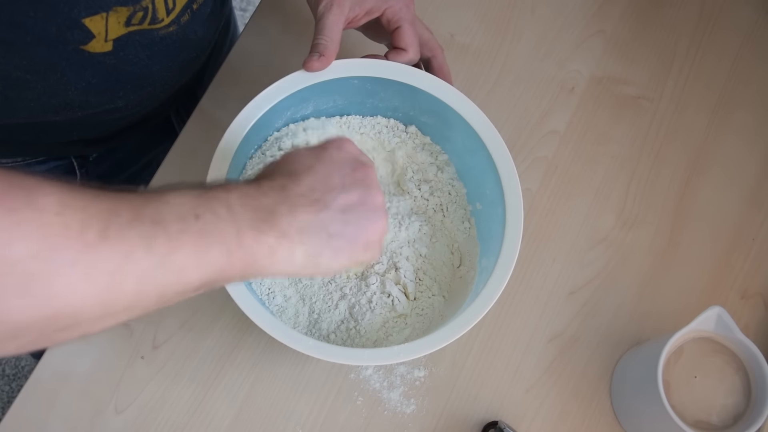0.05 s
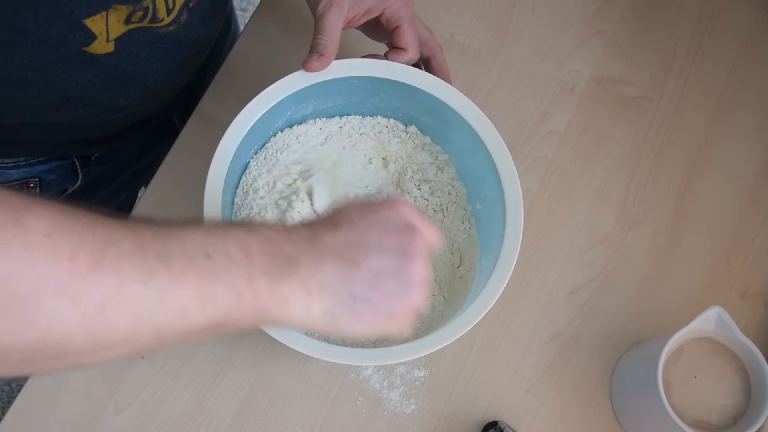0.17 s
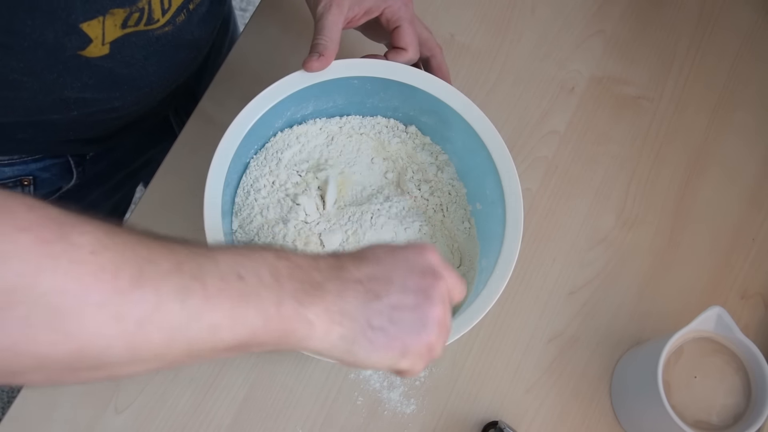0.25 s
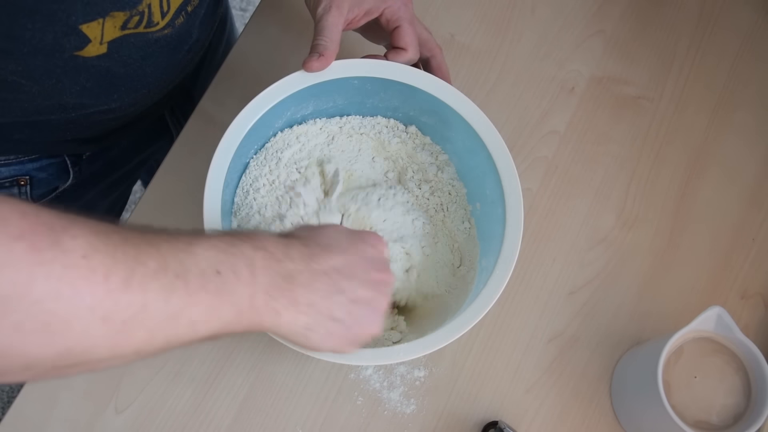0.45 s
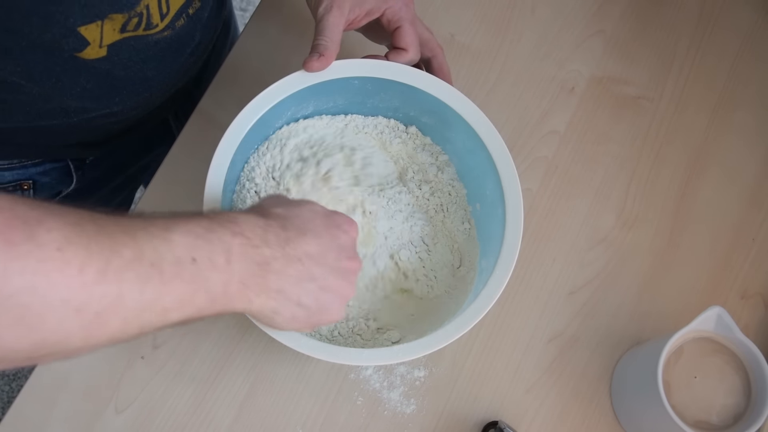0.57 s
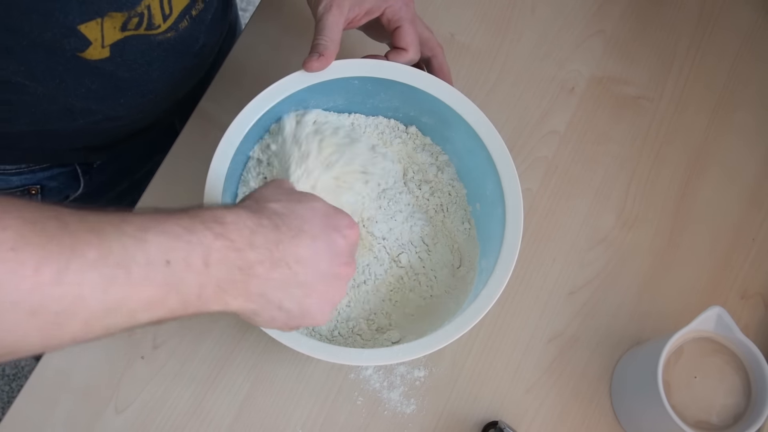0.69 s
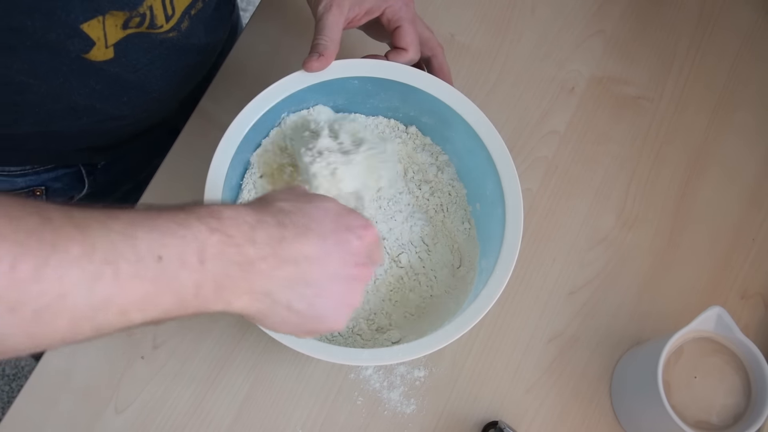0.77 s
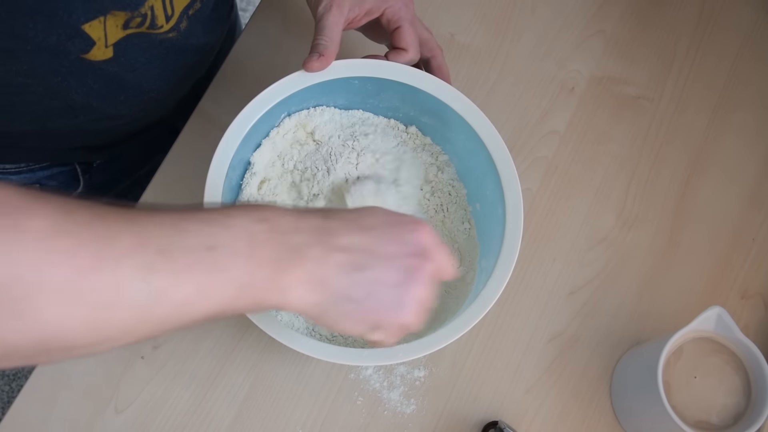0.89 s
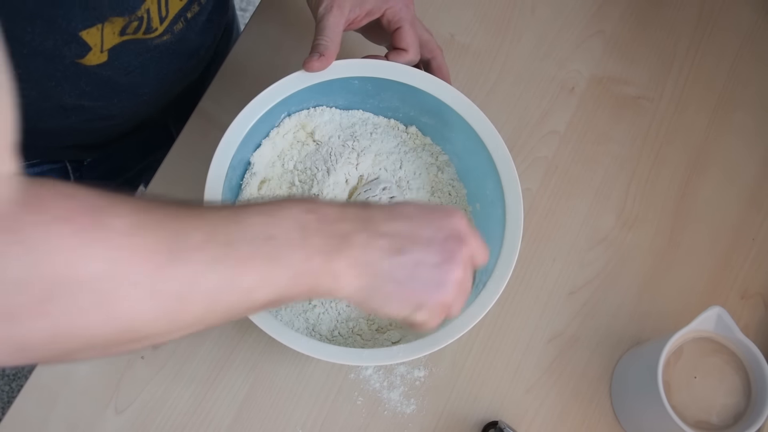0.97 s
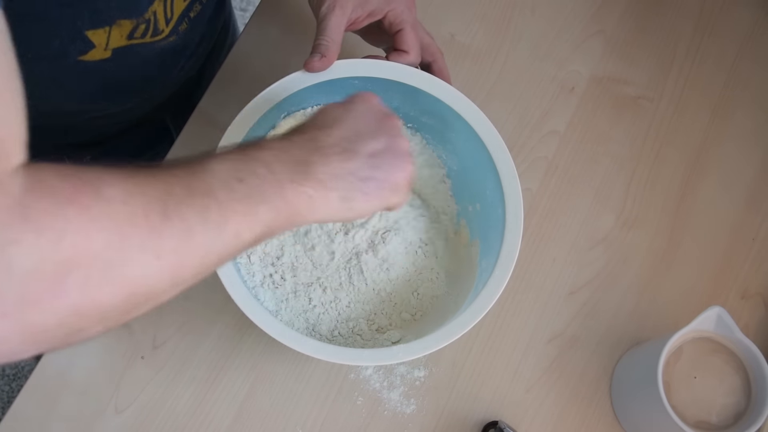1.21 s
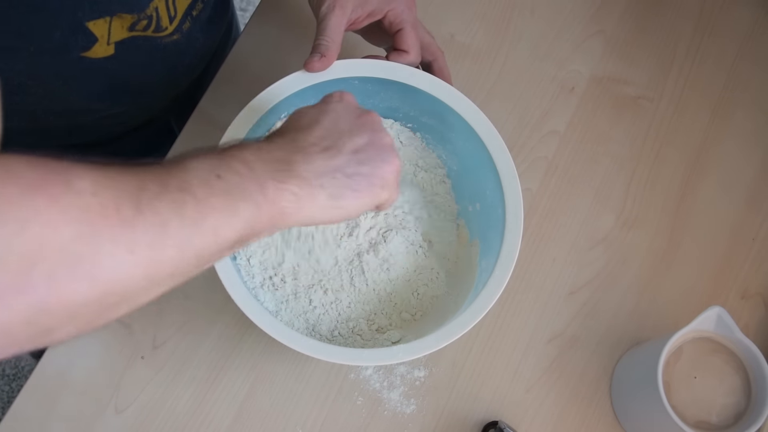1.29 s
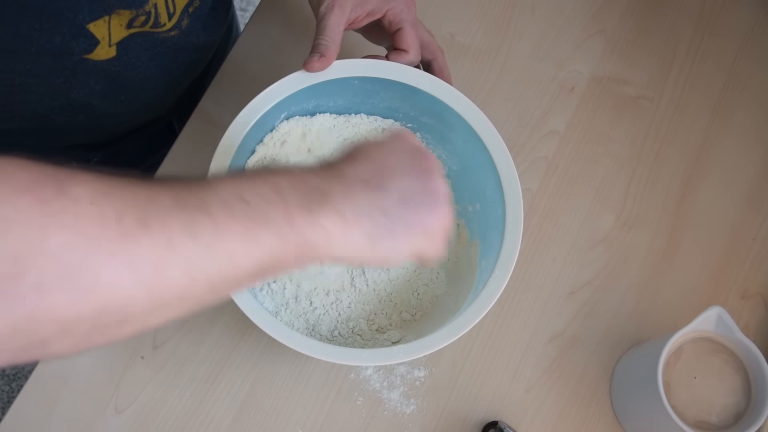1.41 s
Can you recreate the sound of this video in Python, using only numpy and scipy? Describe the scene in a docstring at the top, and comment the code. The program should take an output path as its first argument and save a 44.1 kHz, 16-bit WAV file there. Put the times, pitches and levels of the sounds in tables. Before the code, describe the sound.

Spoon stirring dry flour in a plastic bowl, close up in a small echoing kitchen. A soft grainy rustle runs throughout. A dull knock at 0.23 s, the loudest, brighter hollow clack at 0.33, a muffled thump at 0.49. Quieter rustling follows, then a soft thump at 0.93, a very short raspy scrape at 0.99 and swishes until 1.2. Faint hiss, low hum and thin high whine behind.

```python
"""Stirring flour in a plastic bowl

A spoon stirs dry flour in a plastic mixing bowl on a wooden table, in a small kitchen that answers with echo.
It knocks the wall four times, mostly cushioned by flour: decaying tones and noise bursts make thump and ring.
It scrapes once along the bare plastic: tiny random slips ring the spoon. Finer slips make the flour whisper.
Behind lie shaped noise for a faint hiss, rumble and hum, and a wavering sine for a thin high whine."""
import sys
import numpy as np
from scipy import signal
from scipy.fft import rfft, irfft, next_fast_len
from scipy.io import wavfile

SR = 44100
rng = np.random.default_rng(int(sys.argv[2]) if len(sys.argv) > 2 else 0)


def master(y):
    """Save y as 16-bit WAV."""
    cut = np.clip(np.atleast_2d(y).T, -1, 1)
    pcm = np.round(cut * 32767)  # scale
    wavfile.write(sys.argv[1], SR, pcm.astype(np.int16))


N = 63945  # length in samples

# colour of flour crushed under the spoon and of the scrape's rasp: (frequency [Hz], level [dB per Hz])
GRIT_COLOUR = [(500, -3.5), (2000, 8), (3000, 4.5), (4200, 3.5), (6300, 0), (8200, -3.5), (9800, -3),
               (13000, -23), (16000, -16)]


def amp(db):
    """Turn decibels into an amplitude factor."""
    return 10 ** (np.asarray(db) / 20)


def unit(x):
    """Scale x to an rms level of 1."""
    return x / np.sqrt(np.mean(x ** 2) + 1e-20)


def along(points, hz):
    """Read a curve of (frequency, value) points, joined by lines on a log frequency axis."""
    freqs, values = np.transpose(points)
    return np.interp(np.log(hz + 1), np.log(freqs + 1), values)


def filtered(x, response):
    """Multiply the spectrum of x by a response, which may be complex."""
    size = next_fast_len(N + SR // 2)
    hz = np.fft.rfftfreq(size, 1 / SR)
    return irfft(rfft(x, size) * response(hz), size)[..., :N]


def causal(x, gain):
    """Filter x by a gain curve with minimum phase, so that no sound comes before its cause."""
    size = 2 * next_fast_len(N)
    hz = np.fft.rfftfreq(size, 1 / SR)
    cepstrum = irfft(np.log(np.maximum(gain(hz), 1e-6)), size)
    # folding the second half onto the first gives the minimum phase
    cepstrum[1:size // 2] *= 2
    cepstrum[size // 2 + 1:] = 0
    return irfft(rfft(x, size) * np.exp(rfft(cepstrum)), size)[:N]


def coloured(x, spectrum):
    """Shape x by a spectrum curve, at rms 1."""
    return unit(filtered(x, lambda hz: amp(along(spectrum, hz))))


def noise(spectrum):
    """Make random noise with the given colour, at rms 1."""
    return coloured(rng.standard_normal(N), spectrum)


def band(centre_hz, width_hz):
    """Make noise gathered around one frequency, at rms 1."""
    return unit(filtered(rng.standard_normal(N), lambda hz: 1 / (1 + ((hz - centre_hz) / width_hz) ** 2)))


def struck(t, attack, t60):
    """Rise quickly, then die away by 60 dB every t60 seconds, as struck things do."""
    return (1 - np.exp(-t / attack)) * amp(-60 * t / t60)


def slips():
    """Scatter tiny stick-slip impulses of uneven size and random sign, at rms 1."""
    slips_per_s, spread_db = 3500, 5
    hit = rng.random(N) < slips_per_s / SR
    sign = rng.choice([-1, 1], N)
    return unit(hit * sign * amp(spread_db * rng.standard_normal(N)))


def kitchen(x):
    """Add a diffuse echo of decaying noise to the direct sound; mainly its treble spreads sideways."""
    # how long the echo takes to fade by 60 dB: (frequency [Hz], time [s])
    echo_t60 = [(100, 0.29), (400, 0.32), (1000, .5), (2500, 0.41), (6000, 0.29), (14000, 0.42)]
    # how strongly the room answers: (frequency [Hz], level [dB])
    echo_gain = [(100, 3.5), (400, -3), (1000, -8.5), (2500, -4.5), (8000, -2), (15000, -7.5)]
    # sideways spread of the echo: (frequency [Hz], side level over middle [dB])
    echo_width = [(100, -29), (600, -74), (1300, -19.5), (2500, -11.5), (5000, -6.5), (9000, -3),
                  (15000, -2)]
    delay_s, build_s = 0.0049, 0.0077
    hz, t, cells = signal.stft(rng.standard_normal((2, SR)), SR, nperseg=256)
    fade = struck(np.maximum(t - delay_s, 0), build_s, along(echo_t60, hz)[:, None])
    tail = signal.istft(cells * fade, SR, nperseg=256)[1]
    tail = tail / np.linalg.norm(tail[0])
    echo = signal.fftconvolve(x[None], tail, axes=1)[:, :N]
    echo = filtered(echo, lambda f: amp(along(echo_gain, f)))
    mid = x + echo[0]
    side = filtered(echo[1], lambda f: amp(along(echo_width, f)))
    return np.array([mid + side, mid - side])


def background():
    """Steady shaped noise makes hiss, rumble and hum; a sine with wandering phase makes the whine."""
    # hiss shared by both ears: (frequency [Hz], level [dB per Hz])
    hiss_mid = [(25, 0), (290, -7.5), (400, -3.5), (520, -0.5), (800, 3.5), (1900, -5), (2150, -5),
                (2350, 5.5), (2520, -34), (2750, 2.5), (3050, 3), (3450, -11.5), (4200, -4), (4580, 3),
                (4950, -10), (5280, -1), (5800, -10.5), (6300, -3), (7100, -17), (10000, -19),
                (15000, -26.5)]
    # hiss that differs between the ears: (frequency [Hz], level [dB per Hz])
    hiss_side = [(25, 1.5), (280, -16.5), (1100, -5), (2000, -4.5), (2850, -0.5), (3300, -2.5),
                 (3650, -2.5), (4100, -6), (4550, 1.5), (5050, -17), (5900, -5), (6300, -15), (6700, -13),
                 (10000, -19.5), (15000, -19)]
    # low rumble: (frequency [Hz], level [dB per Hz])
    rumble = [(20, 14), (60, 9), (120, -9), (300, -35), (1000, -63)]
    hiss_mid_db, hiss_side_db, rumble_db = -58, -60, -81
    hum_hz, hum_width_hz, hum_db = 390.6, 15, -72.5
    whine_hz, whine_db = 15690, (-91, -70.5)  # levels (left, right)
    whine_drift = .02  # random phase step in radians per sample
    mid = amp(hiss_mid_db) * noise(hiss_mid)
    mid = mid + amp(rumble_db) * noise(rumble) + amp(hum_db) * band(hum_hz, hum_width_hz)
    side = amp(hiss_side_db) * noise(hiss_side)
    wander = np.cumsum(whine_drift * rng.standard_normal(N))
    whine = np.sin(2 * np.pi * whine_hz * np.arange(N) / SR + wander)
    return np.array([mid + side, mid - side]) + amp(whine_db)[:, None] * whine


def flour():
    """Fine grains slip over each other and rustle with the effort of stirring."""
    # stirring effort, as rustle before a small lift: (time [s], level [dB])
    effort = [(0, -61), (.12, -65.5), (0.212, -57), (.3, -59.5), (.6, -59), (.74, -66.5), (.82, -63),
              (.89, -65.5), (.93, -56), (1.08, -54), (1.168, -61), (1.199, -52), (1.235, -62.5),
              (1.32, -64.5), (1.45, -61.5)]
    # colour of the rustle: (frequency [Hz], level [dB per Hz])
    rustle_colour = [(100, -51), (400, -3), (1400, 4), (2400, 5.5), (3500, -2.5), (6000, -5.5),
                     (10000, -22.5), (16000, -24)]
    lift_db = 0.5
    effort_db = np.interp(np.arange(N) / SR, *np.transpose(effort))
    return kitchen(amp(effort_db + lift_db) * coloured(slips(), rustle_colour))


def scrape():
    """The spoon sticks and slips along the wall under a swelling and fading pressure, and rings."""
    # overlapping swells of pressure: (time [s], peak level [dB], rise [s], fall [s])
    swells = [(.981, -42, 0.0022, 0.014), (0.992, -33.5, 0.0067, 0.0092)]
    # what the sliding spoon rings with: (frequency [Hz], width [Hz], level [dB])
    spoon_modes = [(830, 630, -13.5), (1432, 73, 3), (1770, 115, -9.5), (2387, 88, 0), (2880, 600, -23),
                   (3429, 60, -5), (4510, 133, -14.5), (9150, 1100, -58), (11700, 700, -34.5)]
    rasp_db = -8.5
    t = np.arange(N) / SR
    pressure = sum(amp(db) * np.exp(np.minimum((t - s) / rise, (s - t) / fall))
                   for s, db, rise, fall in swells)

    def spoon(f):
        """Sum the spoon's resonances, with alternating signs."""
        return sum((-1) ** k * amp(db) * 1j * f * width / (centre ** 2 - f ** 2 + 1j * f * width)
                   for k, (centre, width, db) in enumerate(spoon_modes))

    friction = slips()
    steady_level = np.std(filtered(friction, spoon))
    ringing = filtered(friction * pressure, spoon) / steady_level
    rasp = amp(rasp_db) * pressure * coloured(friction, GRIT_COLOUR)
    return kitchen(ringing + rasp)


def chatter(envelope, t):
    """A dying burst of tiny contacts, evened out over frequency; also returns its strength."""
    evenness = 0.84  # 1 would make all frequencies equally strong
    burst = rng.standard_normal(N) * envelope
    spectrum = rfft(burst, 2 * next_fast_len(N))
    even = irfft(spectrum / (np.abs(spectrum) + 1e-12) ** evenness)[:N]
    return unit(even * (t > 0)), np.sqrt(np.mean(envelope ** 2))


def knock(s, thump_db, wall_hz, rise, rebound_db, clatter_db, cut_hz, ring_db, grit_db,
          tick_hz, tick_db, clack_hz, clack_db):
    """The wall thumps and rebounds, bowl clatters and rings, spoon clacks and ticks, flour crunches."""
    # the bowl's ringing tones: (frequency [Hz], level [dB], time to fade by 60 dB [s])
    bowl_modes = [(127.1, -25, 0.67), (237.7, -17.5, 0.32), (343.2, -11.5, 0.44), (417.8, -8.5, 0.36),
                  (462, -17, 0.48), (627.6, -7.5, 0.33), (742.3, -1, 0.18), (814, -5, 0.27),
                  (948, -3, 0.26), (1042, -6.5, 0.32), (1191, -7, 0.16), (1460, -4, 0.17), (1644, -3, 0.11),
                  (1755, -6.5, 0.28)]
    # many quickly damped tones of bowl and table: (frequency [Hz], level [dB per Hz])
    clatter_colour = [(30, -46.5), (110, -12), (200, -9), (380, 3.5), (700, 5), (1200, -1.5), (1750, 1),
                      (2100, -1.5), (2800, -5.5), (5000, -7), (16000, -11)]
    sag_share, sag_s = 0.75, 0.0014  # the wall starts this share higher and sags as it gives
    rebound_s, cut_order = .0128, 2.36
    attack_s, ring_attack_s = 0.00045, 0.00033
    clatter_t60, grit_t60, tick_t60, clack_t60 = 0.086, 0.089, 0.077, 0.046  # seconds
    tick_width_hz, clack_width_hz = 650, 170
    t = np.maximum(np.arange(N) / SR - s, 0)

    def soft(hz):
        """A cushioned contact excites less treble."""
        return 1 / np.sqrt(1 + (hz / cut_hz) ** (2 * cut_order))

    def flex(u):
        """The wall bends with a short tone that falls in pitch."""
        cycles = wall_hz * (u + sag_share * sag_s * (1 - np.exp(-u / sag_s)))
        swell = (u / rise * np.exp(1 - u / rise)) ** 2
        return np.sin(2 * np.pi * cycles) * swell

    thump = flex(t) + amp(rebound_db) * flex(np.maximum(t - rebound_s, 0))
    contacts, strength = chatter(struck(t, attack_s, clatter_t60), t)
    clatter = strength * unit(causal(contacts, lambda hz: amp(along(clatter_colour, hz)) * soft(hz)))
    grit = coloured(slips(), GRIT_COLOUR) * struck(t, attack_s, grit_t60)
    tick = band(tick_hz, tick_width_hz) * struck(t, attack_s, tick_t60)
    clack = band(clack_hz, clack_width_hz) * struck(t, attack_s, clack_t60)
    ring = 0
    for hz, db, t60 in bowl_modes:
        level = amp(db + rng.normal(0, 1)) * soft(hz)  # each blow excites the tones a little differently
        tone = np.sin(2 * np.pi * (hz * t + rng.random()))
        ring = ring + level * tone * struck(t, ring_attack_s, t60)
    ring = ring / np.sqrt(len(bowl_modes))
    blow = amp(thump_db) * thump + amp(clatter_db) * clatter + amp(grit_db) * grit
    blow = blow + amp(tick_db) * tick + amp(clack_db) * clack
    return kitchen(blow) + amp(ring_db) * ring  # the ring gets no echo


def scene():
    """Everything heard at the table; the small bowl radiates little deep bass."""
    # spoon on the bowl: (time [s], thump [dB], settled wall pitch [Hz], thump rise [s],
    # rebound over thump [dB], clatter [dB], contact cut-off [Hz], ring [dB], grit [dB],
    # tick pitch [Hz], tick [dB], clack pitch [Hz], clack [dB])
    knocks = [(0.2349, -22.5, 478.5, 0.0031, -34, -28, 1500, -25.5, -43, 11050, -57.5, 2850, -41),
              (.3272, -12.5, 835, 0.0013, 0, -18.5, 2170, -15.5, -42, 8400, -49, 1800, -27.5),
              (.4926, -19.5, 608, 0.0011, -17, -26, 1060, -22.5, -46, 7370, -50, 3380, -45.5),
              (.9310, -22.5, 450, 0.0021, -15, -28.5, 930, -25.5, -47.5, 8460, -60, 2880, -44)]
    # how well the bowl sends out bass: (frequency [Hz], level [dB])
    radiation = [(30, -28), (75, -1.5), (130, -1), (170, -3.5), (240, -1), (290, -3), (360, -1)]
    bowl = flour() + scrape() + sum(knock(*row) for row in knocks)
    radiated = [causal(ear, lambda hz: amp(along(radiation, hz))) for ear in bowl]
    return background() + np.array(radiated)


def record(dry):
    """Keep nothing above a band limit and add a tiny constant offset."""
    top_hz, offset = 16300, -.0028
    return filtered(dry, lambda hz: hz < top_hz) + offset


dry = scene()
out = record(dry)
master(out)
```